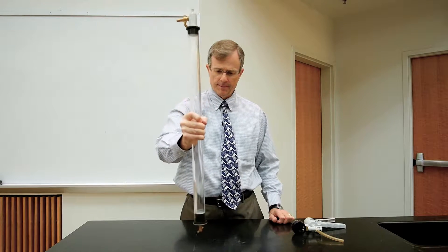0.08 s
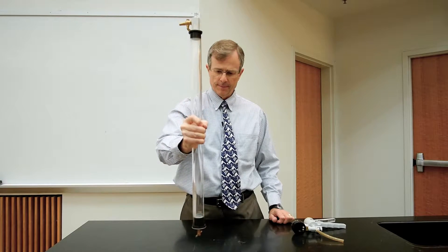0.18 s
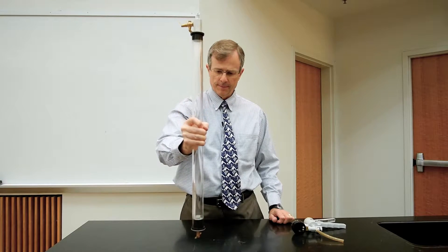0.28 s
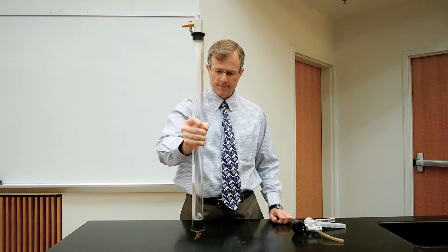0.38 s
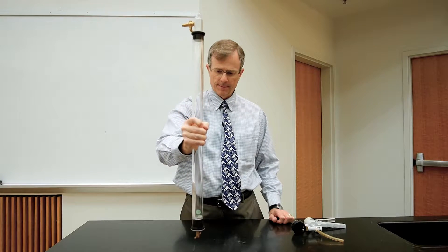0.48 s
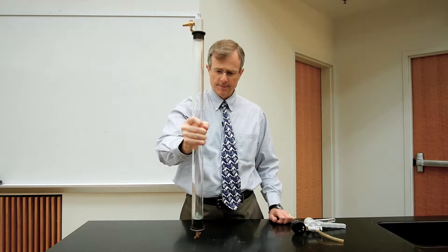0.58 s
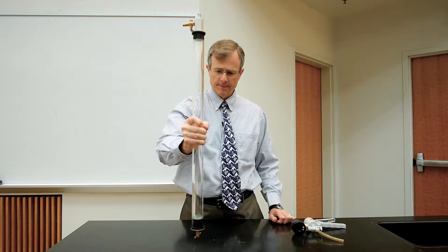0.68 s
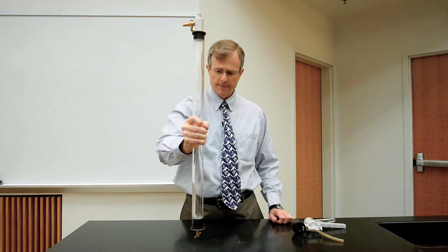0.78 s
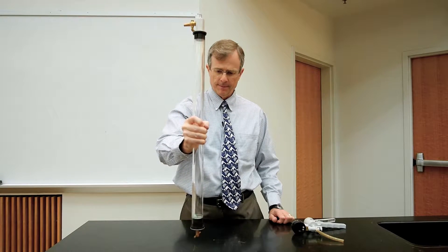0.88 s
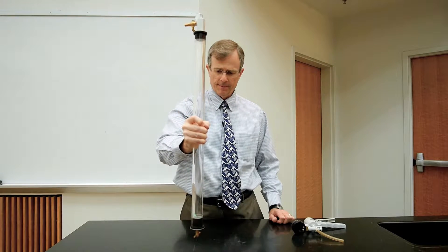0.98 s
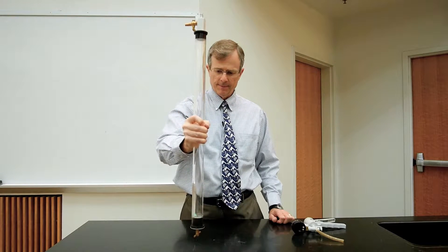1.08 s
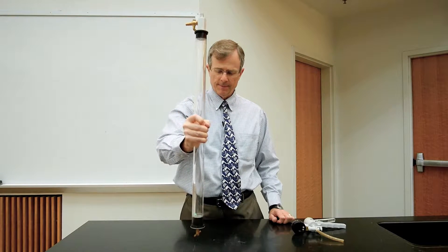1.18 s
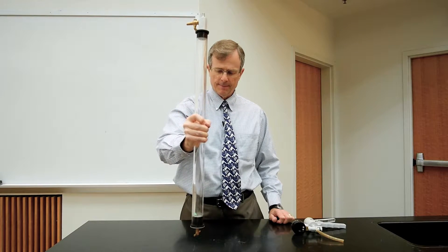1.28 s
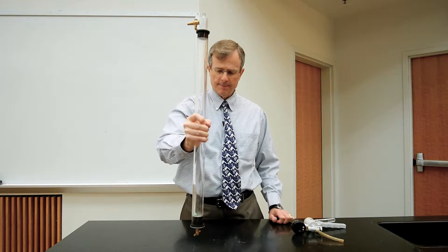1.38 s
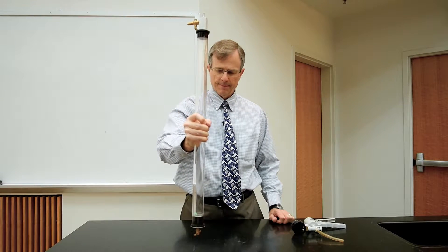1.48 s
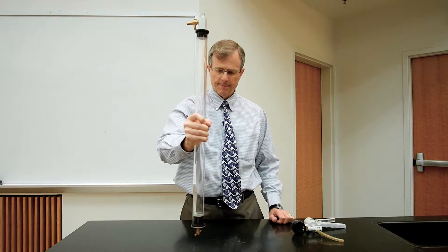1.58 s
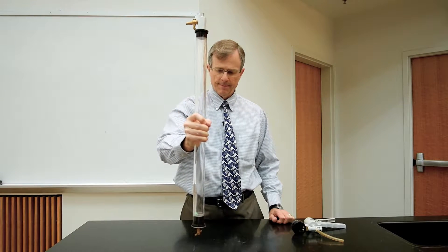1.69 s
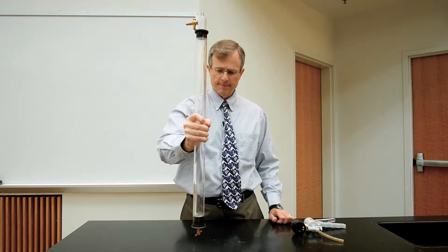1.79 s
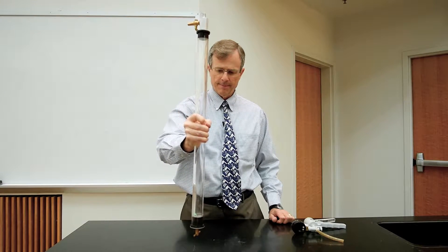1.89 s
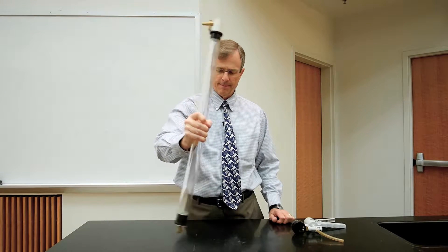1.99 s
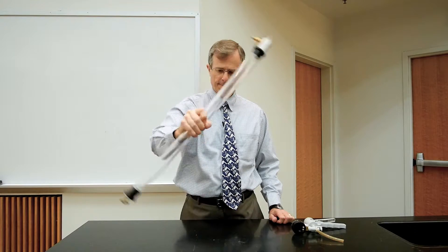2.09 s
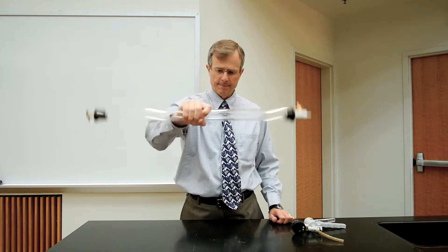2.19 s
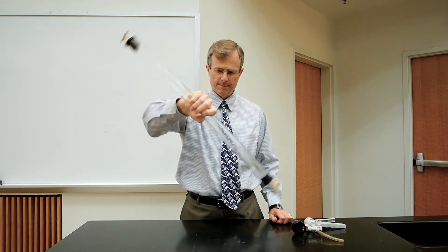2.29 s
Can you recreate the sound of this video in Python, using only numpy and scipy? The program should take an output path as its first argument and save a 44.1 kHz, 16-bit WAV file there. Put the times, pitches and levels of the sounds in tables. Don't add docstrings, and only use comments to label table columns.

```python
import sys
import numpy as np
from scipy import signal
from scipy.fft import rfft, irfft
from scipy.io import wavfile
from scipy.ndimage import uniform_filter1d

SR = 44100
rng = np.random.default_rng(int(sys.argv[2]) if len(sys.argv) > 2 else 0)


def int16_out(signal):
    q = np.round(np.clip(np.atleast_2d(signal).T, -1, 1) * 32767)
    wavfile.write(sys.argv[1], SR, q.astype(np.int16))


def boost(x):
    u = np.asarray(x, float) / 20
    return 10 ** u


N = 101430


def level(x, db):
    return x * boost(db) / np.sqrt(np.mean(x ** 2))


def colour(x, table):
    hz, db = np.array(table).T
    f = np.arange(N // 2 + 1) * SR / N + 1
    gain = boost(np.interp(np.log(f), np.log(hz), db, left=-80, right=-80))
    return irfft(rfft(x) * gain * (f < 15900), N)


def curve(table):
    s, db = np.array(table).T
    return boost(np.interp(np.arange(N) / SR, s, db, left=-140, right=-140))


def walk(rate):
    k = int(SR / rate)
    held = np.repeat(rng.standard_normal(N // k + 1), k)
    return 1.46 * uniform_filter1d(uniform_filter1d(held, k), k)[:N]


def grains():
    per_s, spread_db = 11000, 4.2
    present = rng.random(N) < per_s / SR
    sign = np.sign(rng.standard_normal(N))
    return present * sign * boost(spread_db * rng.standard_normal(N))


def ring(body, damping, crack_db, pitch):
    rise_s, crack_s = .00015, .0005
    t = np.arange(2048) / SR
    modes = np.zeros(2048)
    for k, (hz, width, db) in enumerate(body):
        decay = np.exp(-np.pi * width * damping * t)
        modes += (-1) ** k * boost(db) * width * decay * np.sin(2 * np.pi * hz * pitch * t)
    modes = modes * (1 - np.exp(-t / rise_s))
    crack = boost(crack_db) * rng.standard_normal(2048) * np.exp(-t / crack_s)
    return modes / np.abs(modes).max() + crack


def strike(body, hits, damping, crack_db, pitch=1):
    chatter_db_at_1_ms = -12
    out, t = np.zeros(N), np.arange(512) / SR
    answer = ring(body, damping, crack_db, pitch)
    chance = rng.standard_normal((len(hits), 2, 512))
    for (s, db, ms), (size, gate) in zip(hits, chance):
        fade = np.exp(-(t * 1000 / max(ms, .05)) ** 2)
        push = boost(chatter_db_at_1_ms) * ms * size * (gate > 1) * fade
        push[0] = 1
        hit = signal.fftconvolve(push, answer)
        i = int(round(s * SR))
        out[i:i + len(hit)] += boost(db) * hit / np.abs(hit).max()
    return out


def ventilation():
    # (frequency [Hz], density [dB per Hz])
    rumble = [(24, -41), (40, -14.5), (75, -4.5), (102, -1), (219, -1.5), (511, -10), (746, -11),
              (911, -19), (3000, -35), (3900, -69), (6600, -120)]
    air, out = colour(rng.standard_normal(N), rumble), 0
    for hz in 22 * 2. ** np.arange(8):
        band = colour(air, [(hz / 2, -60), (hz / 1.99, 0), (hz * .999, 0), (hz, -60)])
        out = out + band * boost(0.73 * walk(4.19))
    t = np.arange(N) / SR
    tones = np.zeros(N)
    for hz, db in ((85, -57), (738, -64)):
        strength = boost(db + 2 * walk(5.18))
        tones += strength * np.sin(2 * np.pi * hz * t + 1.1 * walk(7.78))
    return level(out, -43) + tones


def hiss():
    # (frequency [Hz], density [dB per Hz])
    spectrum = [(1760, -48), (3000, -0.5), (3430, -3), (15100, -8.5), (16000, -12)]
    return level(colour(rng.standard_normal(N), spectrum), -65.5)


def sleeve():
    # (frequency [Hz], density [dB per Hz])
    cloth = [(800, 1), (2000, 2), (4000, -6.5), (8000, -9.5), (16000, -19)]
    # (time [s], level [dB])
    motion = [(1.9, -86), (2.05, -76), (2.12, -65.5), (2.18, -66), (2.22, -60.5), (2.25, -62), (2.31, -56)]
    return level(colour(grains(), cloth), 0) * curve(motion)


def room(x):
    t60_s, build_s, echo_s = .4, .0049, .0016
    t = np.arange(SR // 2) / SR
    decay = np.exp(-np.log(1000) * t / t60_s) * (1 - np.exp(-t / build_s))
    tail = rng.standard_normal(len(t)) * decay
    tail = signal.lfilter(*signal.butter(1, 6000, fs=SR), tail)
    tail = tail * boost(-31) / np.sqrt(np.sum(tail ** 2))
    tail[int(echo_s * SR)] += boost(-19)
    return signal.fftconvolve(x, tail)[:N]


def stopper_taps():
    # (frequency [Hz], width [Hz], level [dB])
    stopper = [(3060, 125, 1), (3450, 450, -7), (4600, 500, -19), (5700, 500, -22), (8400, 500, -27)]
    # (time [s], peak [dB], chatter [ms])
    hits = [
        (.008, -54, 2),
        (0.0216, -39, 0.39),
        (0.0452, -45, .3),
        (.066, -35.5, 0.87),
        (.093, -38, 1.14),
    ]
    first = strike(stopper[:3], hits[:3], 1.3, -40, .99)
    return first + strike(stopper, hits[3:], 1, -30)


def glass_taps():
    # (frequency [Hz], width [Hz], level [dB])
    glass = [(5450, 150, -9), (8200, 500, -12), (9150, 350, 0)]
    # (time [s], peak [dB], chatter [ms])
    hits = [(0.251, -38, 3.3), (.3535, -38, 0.91), (.3735, -49, 3), (.38, -47, 1), (.3847, -36.5, 1),
            (.39, -54, 3.3), (0.396, -41, 1), (0.4007, -45, 1)]
    return strike(glass, hits, 1, -34)


def dull_knocks():
    # (frequency [Hz], width [Hz], level [dB])
    flat = [(950, 180, 6), (2230, 150, 5.5), (3430, 580, 2), (4850, 740, 4.5), (8400, 2200, 7.5)]
    knock = [(914, 240, -0.82), (1610, 710, 0.0096)]
    thud = [(150, 170, 0), (400, 350, -3), (750, 500, -6)]
    # (time [s], peak [dB], chatter [ms])
    flat_hits = [
        (.3403, -18, .3),
        (.341, -23, .6),
        (.3476, -38, 1),
        (.4424, -42, 4),
        (.5715, -30, .6),
    ]
    knock_hits = [
        (.2423, -18, .3),
        (.2777, -16.5, .1),
        (.2985, -45, 1),
        (.3405, -36, .5),
    ]
    thud_hits = [
        (.2438, -20, .1),
        (.2785, -27, .1),
    ]
    landings = strike(flat, flat_hits, 1.2, -22)
    return landings + strike(knock, knock_hits, 1, -40) + strike(thud, thud_hits, 1, -40)


def edge_ticks():
    # (frequency [Hz], width [Hz], level [dB])
    edge = [(2500, 900, -13), (5500, 800, -10), (7000, 900, -9), (8300, 850, 0), (9600, 950, -5),
            (11300, 1300, -15), (15400, 1200, -24)]
    snap = [(11300, 1500, 0), (13500, 1500, -3), (15500, 1000, -2)]
    flick = [(6900, 1700, 0), (10300, 1500, -4), (13000, 1100, -2)]
    # (time [s], peak [dB], chatter [ms])
    edge_hits = [(.334, -17, .2), (.3396, -21, .1), (.344, -33, .2), (.4265, -45, .3), (.4337, -42, 1),
                 (.4358, -42, .3), (.4402, -45, .3), (.445, -44, .3), (.4985, -40, .3), (.5003, -45, .3),
                 (.5012, -39, .3), (.503, -35, .2), (.5051, -40, .5), (.5066, -43, .5), (.5093, -37, .5),
                 (.5119, -35, .4), (.5139, -40, .3), (.5185, -46, .3),
                 (.5566, -47, .3), (.5581, -43, .3), (.562, -42, 1), (.5643, -42, .5), (.5696, -26, .8),
                (.5719, -30, .3), (.5766, -32, .2), (.5786, -38, .2), (.5995, -48, .3), (.603, -48, .3),
                (.61, -46, 2), (.614, -43, .5), (.6186, -31, .15), (.6229, -36, .3), (.6247, -33, .2),
                (.6265, -33, .2), (.629, -42, .5), (.6539, -27, .1), (.6653, -25, .1), (.6695, -38, .3),
                (.6747, -40, .5), (.679, -47, .5), (.6825, -47, .3), (.6846, -26.5, .1), (.6992, -44, .4),
                (.7022, -26, .4), (.7035, -38, .5), (.7048, -35, .2), (.7168, -30, .1), (.719, -44, .5),
                (.7228, -39, .3)]
    snaps = [(.2461, -21, .3), (.2982, -28, .3), (.334, -36, .1), (.3403, -32, .8), (.503, -50, .2),
             (.5696, -41, .5), (.6653, -41, .1), (.7022, -34, .3), (.7168, -45, .2)]
    flicks = [
        (.2594, -15, .1),
        (.2612, -32, 1),
        (.2635, -33, 2),
    ]
    ticks = strike(edge, edge_hits, 1, -32)
    return ticks + strike(snap, snaps, 1, -40) + strike(flick, flicks, 1, -26)


def scrape():
    # (frequency [Hz], density [dB per Hz])
    friction = [(880, -38), (1500, -29), (2120, 1), (2910, -1), (7390, 2.5), (9100, -9), (10900, -8),
                (16000, -23)]
    # (time [s], level [dB])
    slide = [(.24, -82), (.25, -43), (.275, -55), (.3, -49), (.345, -48.5), (.39, -53.5), (.43, -56),
             (.448, -55), (.453, -60), (.49, -67)]
    shuffle = [(.496, -69), (.508, -44), (.53, -89), (.565, -48.5), (.59, -77), (.63, -70), (.67, -62.5),
               (.72, -76), (.74, -88)]
    singing = [(.33, -72), (.372, -57), (.41, -60), (.45, -70)]
    # (frequency [Hz], width [Hz], level [dB])
    sing_modes = [(5450, 160, 0), (9200, 500, -8)]
    rub = level(colour(grains(), friction), 0)
    treble = signal.sosfilt(signal.butter(2, 10000, "high", fs=SR, output="sos"), rub)
    fade_s = .1
    fast = boost(7) * np.exp(-np.abs(np.arange(N) / SR - slide[1][0]) / fade_s)
    glass = signal.fftconvolve(rub, ring(sing_modes, 0.47, -60, 0.96))[:N]
    sing = level(glass, 0) * curve(singing)
    sliding = (rub + fast * treble) * curve(slide)
    return (sing + sliding + rub * curve(shuffle)) * boost(3.4 * walk(200))


def wall_blows():
    # (frequency [Hz], width [Hz], level [dB])
    wall = [(3330, 260, -8.5), (4350, 250, -12), (5040, 230, -14), (6500, 440, -10), (7480, 390, -11),
            (9140, 340, 1), (11200, 600, -12), (12900, 480, -30), (15300, 600, -32)]
    # (time [s], peak [dB], chatter [ms])
    hits = [
        (.2776, -6, .5),
        (.2789, -12, .6),
        (.2805, -26, 1.5),
        (.2838, -30, 1),
        (.2967, -33, .5),
    ]
    return strike(wall, hits, 1.2, -24)


def rim_blows():
    # (frequency [Hz], width [Hz], level [dB])
    rim = [(3250, 500, 0), (4300, 500, -9), (5400, 300, -11), (7200, 860, -16), (9070, 600, 1),
           (12600, 480, -16), (13900, 500, -16), (15400, 700, -14)]
    # (time [s], peak [dB], chatter [ms])
    sharp = [
        (.2462, -11, .2),
        (.24664, -7, .4),
        (.2483, -25, 2),
        (.2927, -37, .5),
        (.2947, -30, .5),
    ]
    soft = [
        (.2812, -28, 1),
        (.298, -31, 2),
        (.3413, -27, .5),
        (.5715, -39, .5),
        (.6992, -44, .3),
        (.7024, -37, .3),
    ]
    return strike(rim, sharp, 1.3, -20) + strike(rim[:3], soft, 1.3, -30)


def coin_blows():
    # (frequency [Hz], width [Hz], level [dB])
    coin = [(3200, 500, -11), (4150, 520, -11), (5550, 500, 0), (6800, 490, -5), (8490, 510, -2),
            (9490, 480, -2), (10600, 700, -10), (12700, 600, 1), (14000, 420, -6), (15300, 800, -6)]
    # (time [s], peak [dB], chatter [ms])
    hits = [
        (.2422, -12, .5),
        (.2429, -9, .5),
        (.24361, -6, .5),
        (.24415, -13, .3),
    ]
    return strike(coin, hits, 1.3, -20)


def tube():
    light = stopper_taps() + glass_taps() + edge_ticks() + scrape()
    heavy = dull_knocks() + wall_blows() + rim_blows() + coin_blows()
    return light + heavy


def scene():
    near = tube()
    return (ventilation() + sleeve() + near + room(near))[None]


def roll_off(x):
    return signal.sosfilt(signal.butter(12, 16670, fs=SR, output="sos"), x)


def record(dry):
    x = dry + hiss()
    x = signal.sosfilt(signal.ellip(8, .2, 70, 15950, fs=SR, output="sos"), x)
    return roll_off(x)


dry = scene()
out = record(dry)
int16_out(out)
```